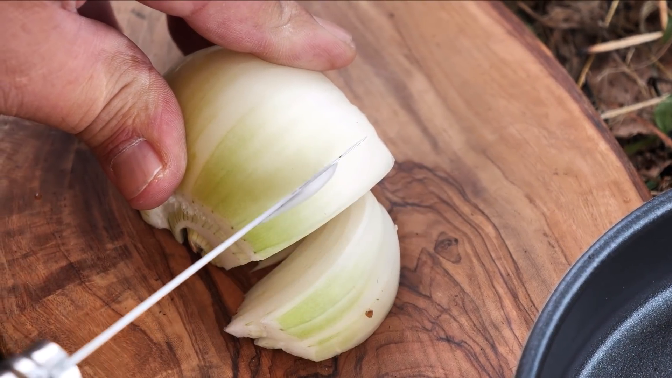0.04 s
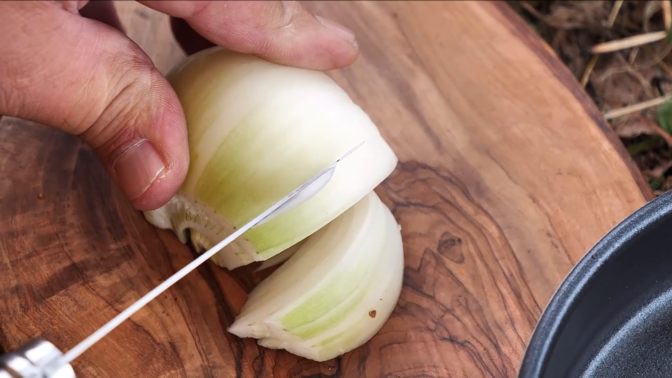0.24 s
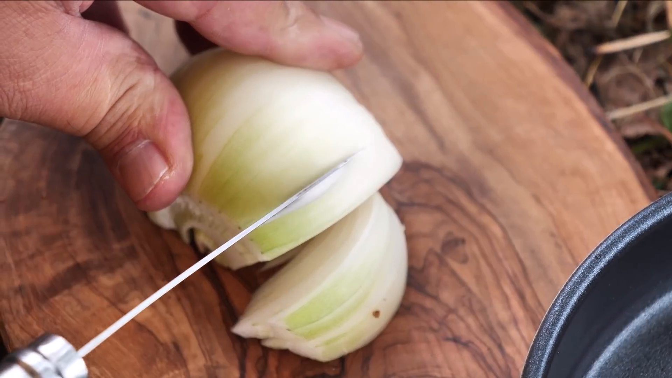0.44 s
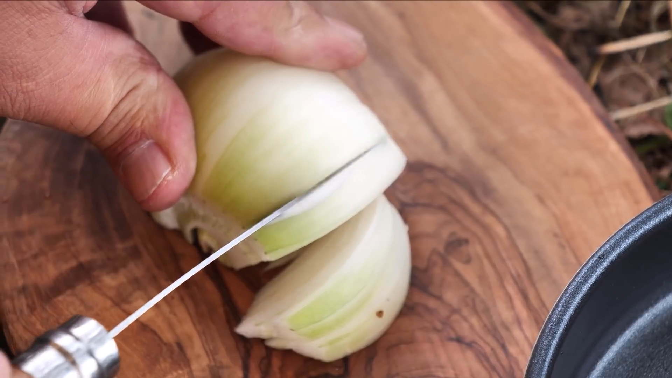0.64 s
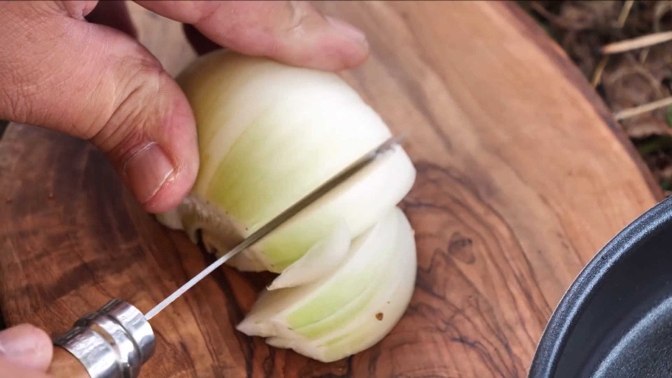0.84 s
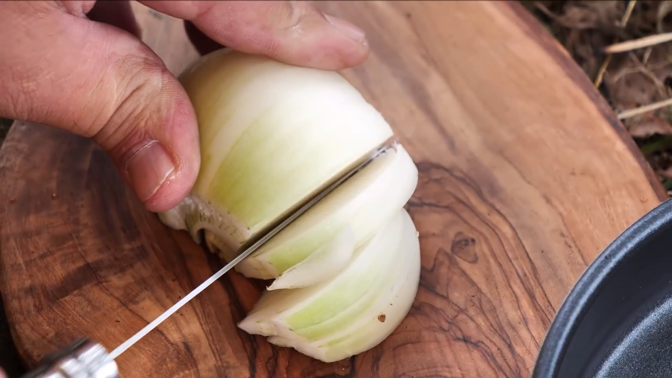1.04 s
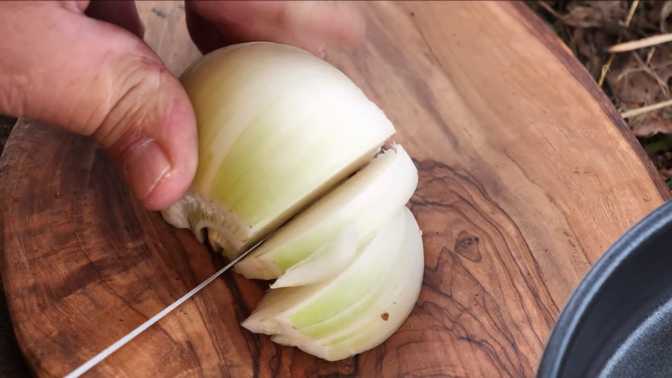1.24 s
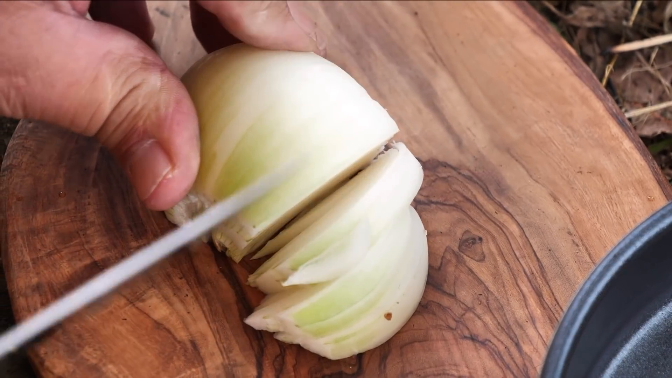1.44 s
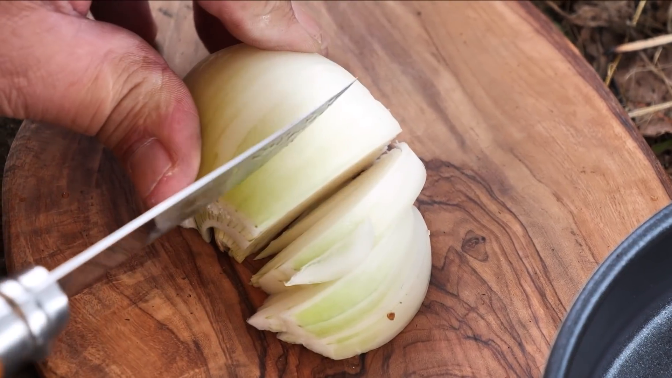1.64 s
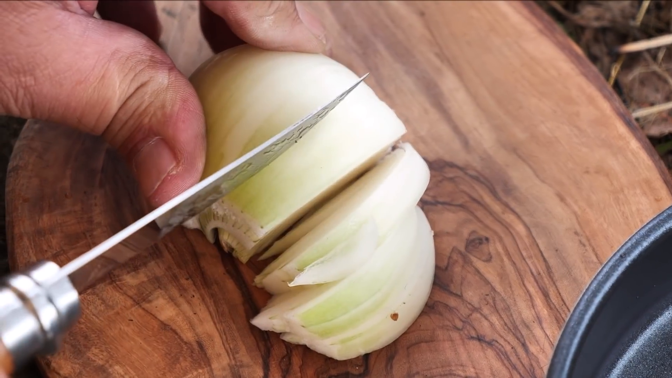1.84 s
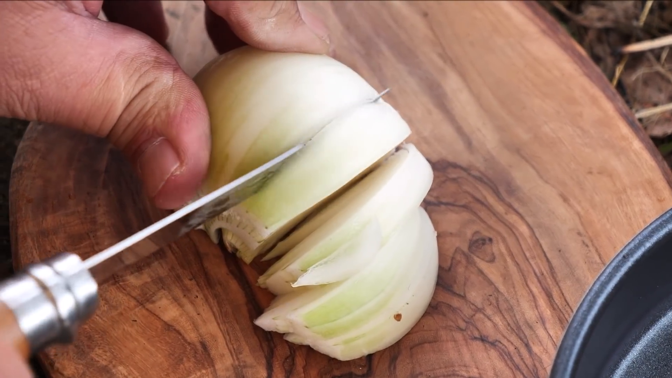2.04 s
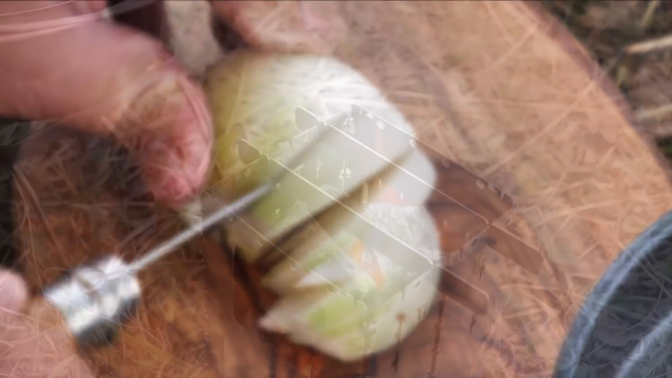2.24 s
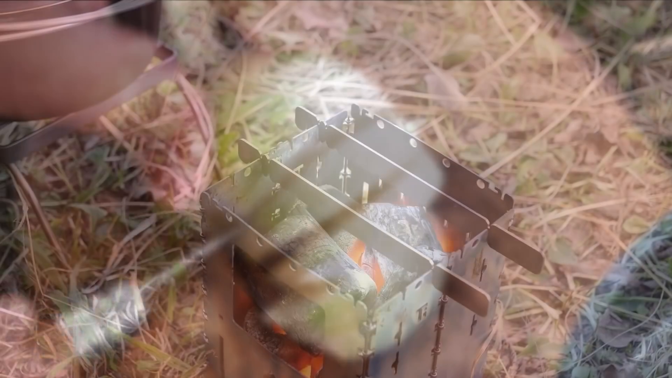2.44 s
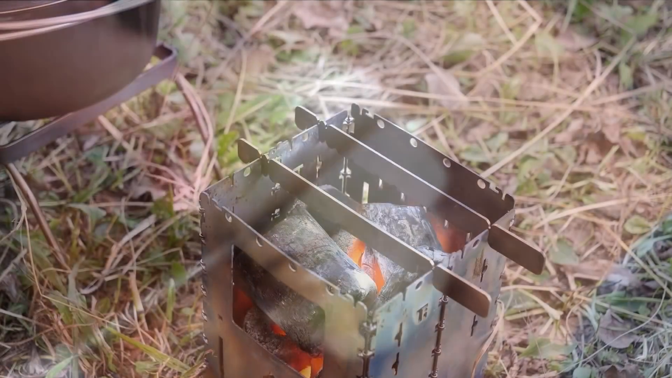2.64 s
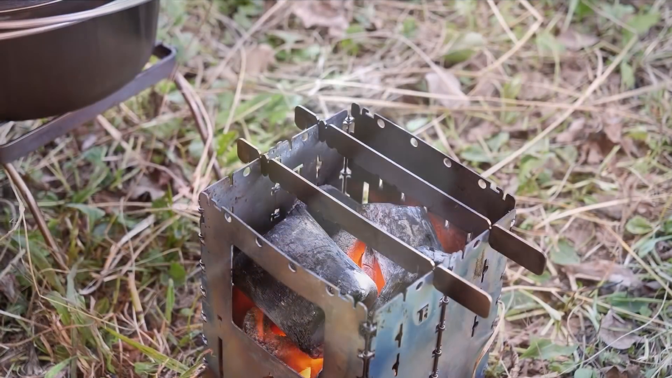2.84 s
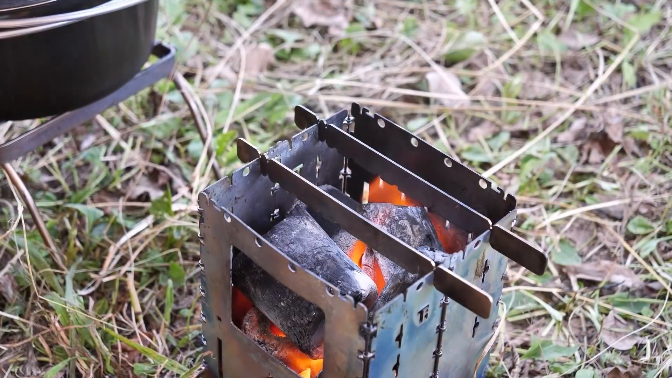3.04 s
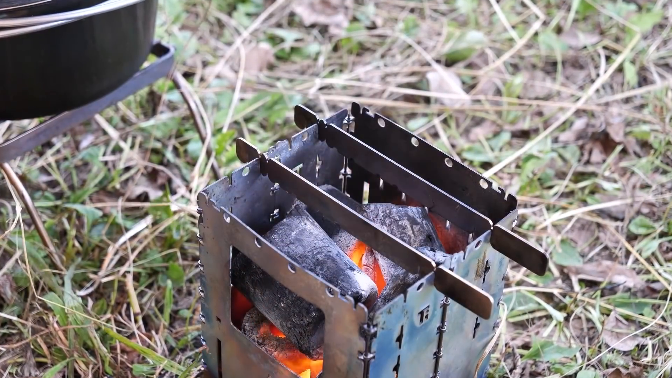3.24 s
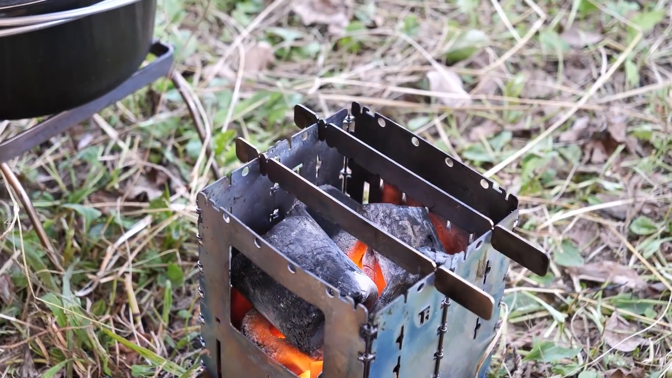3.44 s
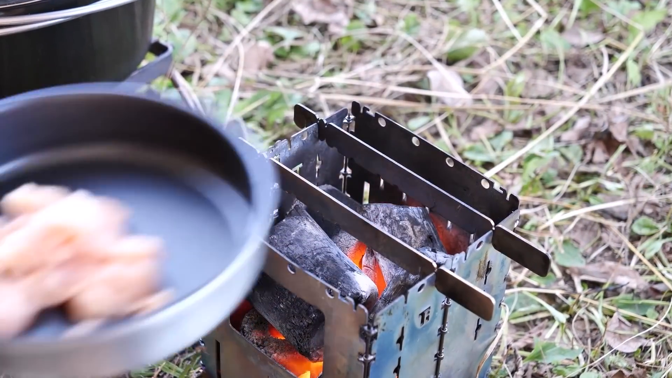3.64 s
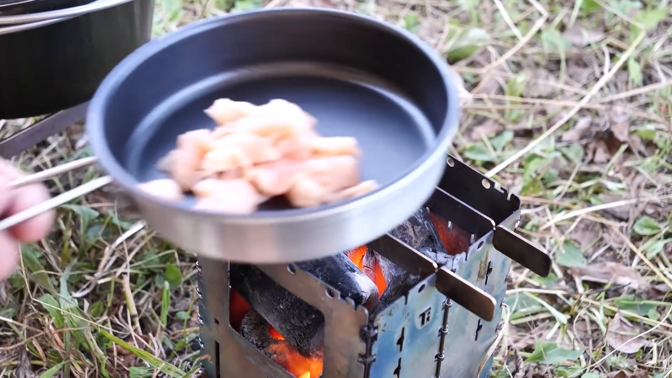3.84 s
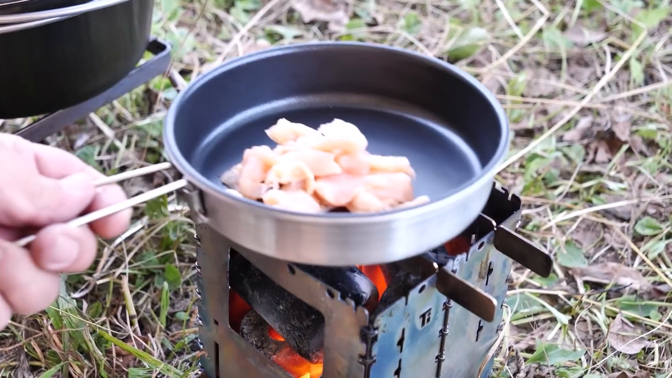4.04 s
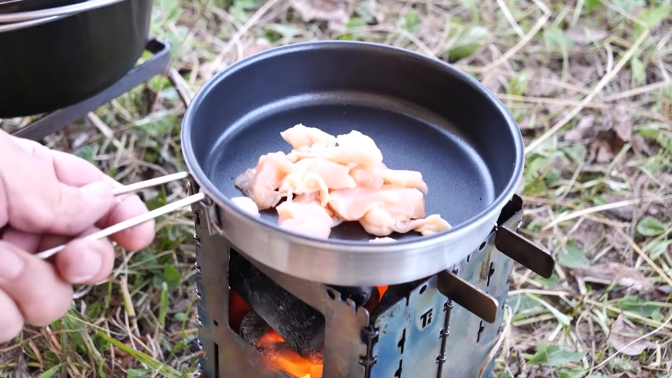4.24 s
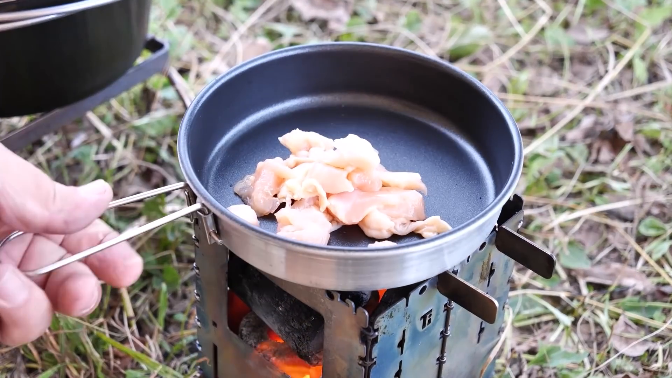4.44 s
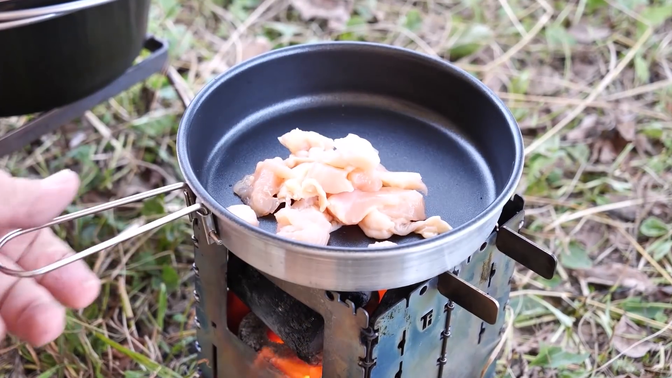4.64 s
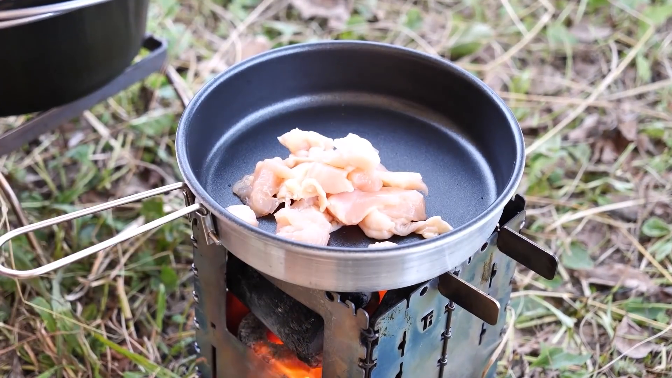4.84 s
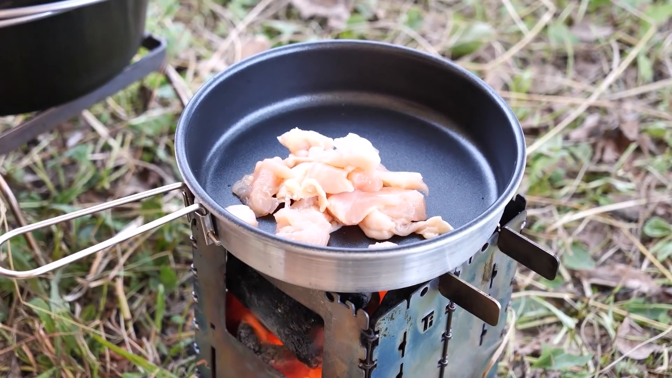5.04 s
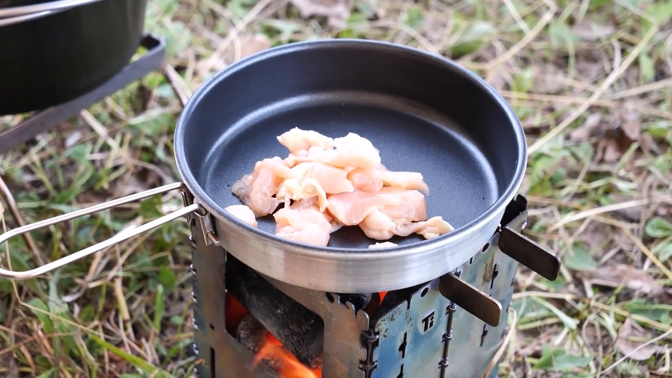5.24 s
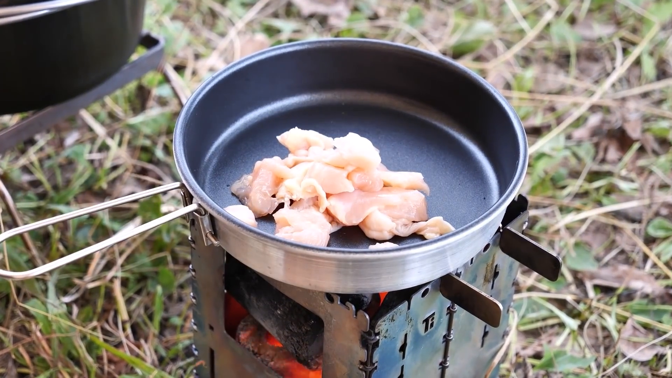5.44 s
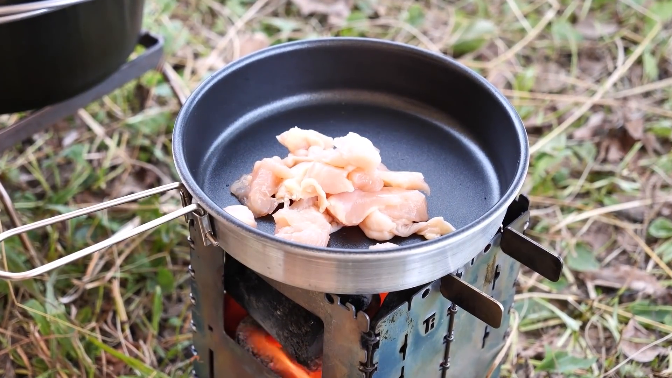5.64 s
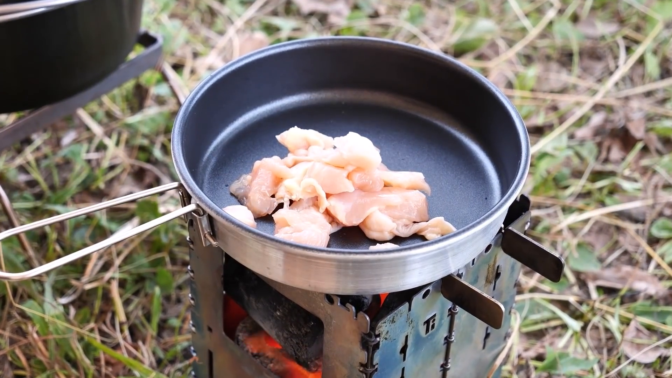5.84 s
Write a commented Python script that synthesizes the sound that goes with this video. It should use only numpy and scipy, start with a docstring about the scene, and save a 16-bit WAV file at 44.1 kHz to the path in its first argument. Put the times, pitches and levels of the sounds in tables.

```python
"""A knife crunches twice through an onion and knocks on a thick wooden board; then a small metal pan
clatters down on the steel bars of a charcoal stove, whose embers tick. Rumble and soft hiss lie below.
Onion: random snaps under swelling pushes. Knife, pan: contact bursts plus decaying modes. Embers: bursts.
The cook's moves: grainy rustle, noise scuffs and bursts. Open air: shaped noise with a wavering band."""
import sys
import numpy as np
from scipy import signal
from scipy.fft import rfft, irfft
from scipy.io import wavfile

SR = 44100
rng = np.random.default_rng(int(sys.argv[2]) if len(sys.argv) > 2 else 0)


def output_pcm(signal):
    """Save a mono or channel-first signal as 16-bit PCM at the path in sys.argv[1].

    Samples are clipped to [-1, 1] before scaling.
    """
    pcm = np.clip(np.atleast_2d(signal).T, -1, 1) * 32767
    wavfile.write(sys.argv[1], SR, np.round(pcm).astype(np.int16))


N = 260471

# left-right correlation of distant or diffuse sound: f/Hz, correlation
FAR_LIKENESS = [(60, 0.9), (130, 0.95), (290, 0.78), (640, 0.35), (1400, 0.025), (3100, 0.023)]
# left-right correlation of nearby sound: f/Hz, correlation
NEAR_LIKENESS = [(300, 1), (800, 0.43), (1500, -0.29), (3000, -0.2), (8000, -0.043)]

PORT_LAG_S = 0.00011  # near sounds reach the left microphone first
EDGES = np.geomspace(22, 17000, 28)  # band edges, Hz
CENTRES = np.sqrt(EDGES[1:] * EDGES[:-1])
AGE = np.arange(SR // 5) / SR  # seconds since a blow


def click_response(band_hz):
    """Impulse response of one band-pass filter."""
    sos = signal.butter(2, band_hz, "band", fs=SR, output="sos")
    return signal.sosfilt(sos, (AGE == 0) + 1e-18)


BANK = np.array([click_response(band_hz) for band_hz in zip(EDGES, EDGES[1:])])


def onion():
    """Random snaps for bursting cells excite faint blade resonances; finer grains fizz as juice, layers snap."""
    # burst cell spectrum: f/Hz, relative density/dB per Hz
    crunch_spectrum = [(100, -34), (600, -7.5), (1000, -13), (2000, -7), (2900, 1), (4200, 2.5), (5600, 4),
                       (8400, -1), (10000, -37), (16000, -33)]
    # pushes, three to a cut: t at full force/s, attack/s, hold/s, release/s,
    # crunch relative level/dB, juice level re crunch/dB
    pushes = [(0.554, 0.045, 0, 0.082, -50.5, -14), (0.697, 0.084, 0.062, 0.27, -50.5, 1),
              (0.921, 0.079, 0, 0.03, -33.5, -7.5), (2.038, .016, 0.033, 0.051, -52, -16),
              (2.093, 0.013, 0.039, 0.081, -49, -11), (2.369, 0.12, 0.041, .03, -42.5, -8.5)]
    # blade damped by the onion: f/Hz, width/Hz, relative level/dB
    damped_blade = [(3370, 1200, -11.5), (5230, 350, -6.5), (8250, 520, -8.5)]
    # whole layers giving way: t/s, relative level/dB
    layer_snaps = [(.555, -51), (0.754, -40), (2.041, -43.5), (2.09, -41.5), (2.107, -42), (2.123, -44),
                   (2.255, -50.5), (2.315, -46)]
    # juice spectrum: f/Hz, relative density/dB per Hz
    spray = [(2000, -47), (7000, -1), (9500, 0), (12000, -5), (13500, -7), (16000, -2)]

    pressure, juice = 0, 0
    for s, attack_s, hold_s, release_s, db, juice_db in pushes:
        push = from_db(db) * swell(s, attack_s, release_s, hold_s)
        pressure = np.hypot(pressure, push)
        juice = np.hypot(juice, push * from_db(juice_db))

    cells = grains(per_s=2500, spread_db=1.5, clump_db=2.2)
    singing = 0
    for k, (hz, width_hz, db) in enumerate(damped_blade):
        peak = signal.iirpeak(hz, hz / width_hz, fs=SR)
        singing = singing + from_db(db) * rms_one(signal.lfilter(*peak, cells[k % 2]))
    out = pressure * (from_db(-2.0) * coloured(cells, crunch_spectrum, NEAR_LIKENESS) + singing)

    droplets = grains(per_s=5000, spread_db=1.5, clump_db=0.5)
    out += juice * coloured(droplets, spray, NEAR_LIKENESS)
    for s, db in layer_snaps:
        snap = burst(crunch_spectrum, t60=0.013, tail_db=-13, tail_t60=0.051, tilt_db=-1.0)
        add(out, s, from_db(db) * snap)
    wet_cut_hz = 12600  # wet flesh soaks up the very top
    return signal.sosfilt(signal.butter(6, wet_cut_hz, fs=SR, output="sos"), out)


def knife():
    """The edge cracks on the board and excites its modes; touches scrape the blade and excite its own."""
    # blade on board: t/s, crack relative level/dB, thud relative level/dB,
    # knock relative level/dB, crack tilt/dB per octave
    chops = [(0.9243, -15, -17.5, -14, 8.5), (.927, -21, -42, -34, -4), (0.9487, -36.5, -55, -53, -7.5),
             (2.4133, -23.5, -33, -41, 2)]
    # board modes: f/Hz, relative level/dB, t60/s
    board_modes = [(350, -9, 0.039), (456, -6, 0.029), (617, 3, 0.026), (724, 2, 0.014), (1513, -9, .022),
                   (2030, -3, 0.011), (3220, -8, .03), (4250, -20, 0.028)]
    # blade contact spectrum: f/Hz, relative density/dB per Hz
    crack_spectrum = [(40, -52), (220, -34), (500, -8), (1000, -16.5), (1800, 4.5), (2300, -11),
                      (2950, 10.5), (3900, 3), (5000, 4), (6400, 7.5), (8000, -12.5), (11000, -18),
                      (16000, -53)]
    # light touches: t/s, scrape relative level/dB, ring relative level/dB, tilt/dB per octave
    touches = [(0.141, -51, -75, 1), (0.164, -48, -72, 1), (0.983, -44, -78, 6), (1.319, -48, -58.5, -5),
               (1.365, -47, -58.5, 9.5), (1.392, -48.5, -58.5, 11), (1.412, -49, -58, 10),
               (1.769, -54.5, -76, 0)]
    # free blade modes: f/Hz, relative level/dB, t60/s
    blade_modes = [(2840, 6, 0.013), (6500, -26, 0.023), (6260, 0.5, 0.06), (8600, -10, 0.068)]

    out = np.zeros((2, N))
    for s, crack_db, thud_db, knock_db, tilt_db in chops:
        crack = burst(crack_spectrum, t60=0.018, tail_db=-25.5, tail_t60=0.16,
                      tilt_db=tilt_db, direct_db=13, crowd_db=1)
        crack = crack * from_db([[.7], [-.7]])
        board_colour = [(700, thud_db), (1500, knock_db)]
        thud = ring(board_modes, board_colour, uneven_db=0.3, contact_s=0.0003)
        thud = thud * from_db([[1.3], [-1.3]])
        add(out, s, from_db(crack_db) * crack + thud)
    for s, scrape_db, ring_db, tilt_db in touches:
        scrape = burst(crack_spectrum, t60=0.026, tail_db=-17, tail_t60=.08, tilt_db=tilt_db)
        blade_colour = [(3000, 7.0 - tilt_db), (7000, 1.5 + tilt_db)]
        tinkle = ring(blade_modes, blade_colour, uneven_db=3.0, contact_s=0.00022)
        add(out, s, from_db(scrape_db) * scrape + from_db(ring_db) * tinkle)
    return out


def pan():
    """Each contact favours other modes and scales their ring time; the free rim keeps its own decay."""
    # pan on stove bars: t/s, relative level/dB, ring time/share of free time, favoured f/Hz, lift/dB
    hits = [(4.155, -27.5, 0.86, 4540, 8), (4.213, -52, 3.3, 1300, 7), (4.254, -21.5, 0.42, 1430, 8.5),
            (4.2855, -39, 0.36, 910, 19), (4.2915, -41, 0.84, 1160, 10), (4.3361, -42.5, 1.1, 7540, 10),
            (4.3596, -23, .8, 6640, 7.5), (4.3689, -24, 0.87, 1020, 9), (4.3896, -22.5, 0.44, 6040, 7.5)]
    # joint pan and stove modes: f/Hz, relative level/dB, free t60/s
    pan_modes = [(365, -15.5, 0.2), (729, -14.5, 0.07), (942, 2.5, 0.024), (894, -2, 0.014),
                 (1034, -3, 0.045), (1180, 7.5, 0.038), (1210, -21, 0.082), (1325, -34, 0.011),
                 (1630, -10, 0.08), (1780, -21, 0.035), (2270, -35, 0.21), (2080, -11.5, 0.086),
                 (3330, -10, 0.031), (3680, -16, 0.1), (3970, -19, 0.025), (4730, -22, 0.063),
                 (5250, -6.5, 0.065), (6210, -12, 0.092), (5830, -19, 0.04), (6330, -6, 0.054),
                 (6400, -33, 0.052), (8200, -19, 0.039), (9170, -18, 0.038), (11300, -21.5, 0.049)]
    # contact spectrum: f/Hz, relative density/dB per Hz
    clatter_spectrum = [(40, -53), (200, -10.5), (400, -1), (900, 3), (1300, 2.5), (2500, -4), (5000, -5.5),
                        (7000, -12.5), (9000, -14), (12000, -45), (16000, -30)]
    # rim modes: f/Hz, relative level/dB, t60/s
    rim_modes = [(1230, -15, .3), (2100, -21, .2)]
    favoured_octaves = 0.51  # standard deviation of the lift

    out = np.zeros((2, N))
    for s, hit_db, free, favoured_hz, lift_db in hits:
        octaves_off = np.log2(CENTRES / favoured_hz)
        colour_db = hit_db + lift_db * np.exp(-.5 * (octaves_off / favoured_octaves) ** 2)
        spectrum = at_hz(clatter_spectrum, CENTRES) + colour_db
        # burst() normalizes its spectrum, so restore the strength
        strength = np.sqrt(np.average(from_db(spectrum) ** 2, weights=np.diff(EDGES)))
        clatter = burst(np.c_[CENTRES, spectrum], t60=0.019 * free, tail_db=-9,
                        tail_t60=0.17 * free, direct_db=12.5, crowd_db=-4)
        modes = [(hz, db, t60 * free) for hz, db, t60 in pan_modes] + rim_modes
        clang = ring(modes, np.c_[CENTRES, colour_db], uneven_db=4.5, contact_s=0.00042)
        add(out, s, from_db(7.5) * strength * clatter + from_db(-2.5) * clang)
    return out * from_db([[-.6], [.6]])


def embers():
    """Small brittle cracks in the glowing charcoal: short bursts around one frequency each."""
    # ticks: t/s, relative level/dB, centre f/Hz
    ticks = [(2.593, -50.5, 7100), (2.709, -43.5, 5600), (2.712, -61, 2030), (3.012, -50.5, 6400),
             (3.027, -44.5, 8700), (3.539, -58, 9000), (3.787, -43.5, 10600), (4.614, -48.5, 6300),
             (5.396, -52, 8200)]
    out = np.zeros((2, N))
    for s, db, hz in ticks:
        hump = [(hz / 20, -45), (hz / 5, -25), (hz / 2.9, -9), (hz, 0), (hz * 1.64, -17), (hz * 4, -35)]
        add(out, s, from_db(db) * burst(hump, t60=0.014, tail_db=-8.5, tail_t60=0.13))
    return out


def handling():
    """The cook moves about: grains rustle, noise scuffs, bursts knock, among them soft touches of the pan;
    fainter knocks fall at random."""
    # larger moves that swell the rustle: t at top/s, attack/s, release/s, hold/s, level/dB
    moves = [(3.54, 0.57, 0.25, 0.13, -52), (5.013, 0.046, 0.11, 0.029, -49),
             (5.538, .15, 0.26, 0.071, -55.5)]
    # cloth and grass spectrum: f/Hz, relative density/dB per Hz
    rustle_spectrum = [(150, -46), (250, -14), (537, -2.5), (632, -7), (843, 4), (1310, -4), (1540, -3),
                       (5000, -4.5), (6500, -58), (11000, -120)]
    # hollow, muffled scuffs: t at top/s, attack/s, release/s, level/dB
    scuffs = [(2.775, 0.042, 0.14, -56.5), (3.09, 0.062, 0.14, -50), (3.24, 0.082, 0.71, -56.5),
              (3.59, 0.22, 0.3, -60)]
    # louder knocks, the pair near 4.07 s soft touches of the pan before it lands: t/s, relative level/dB,
    # tilt/dB per octave
    bumps = [(.452, -46.5, -6.5), (0.522, -46, 1), (2.256, -43.5, -9.5), (2.757, -35, -12),
             (2.788, -44, -10.5), (2.934, -38.5, -9.5), (3.611, -36, -5.5), (3.667, -42, 6),
             (4.0644, -31.5, -.5), (4.0851, -31.5, 2), (4.473, -56, 8), (4.698, -42.5, -2.5),
             (5.008, -38, 5.5), (5.034, -33, -7), (5.212, -42, 6.5), (5.53, -46, 2)]
    # knock spectrum: f/Hz, relative density/dB per Hz
    bump_spectrum = [(30, -34), (150, -10), (400, -6), (650, -4), (880, -2), (1200, -19), (1800, -37),
                     (5000, -39), (16000, -68)]
    # scuff spectrum: f/Hz, relative density/dB per Hz
    hollow = [(60, -38), (280, -3.0), (500, 2), (800, -16.0), (3000, -57)]
    busy_from_s, rustle_db, rustle_attack_s = 3.2, -58.5, 0.33
    faint_count, faint_db, faint_spread_db = 9, -49, 3
    rustle_top_hz = 2400  # soft cloth and grass have little treble

    steady = from_db(rustle_db) * swell(busy_from_s, rustle_attack_s, rustle_attack_s, hold_s=N / SR)
    move_power = sum((from_db(db) * swell(*shape)) ** 2 for *shape, db in moves)
    moving = np.sqrt(steady ** 2 + move_power)
    rustle_grains = grains(per_s=700, spread_db=3.2, clump_db=2.8)
    out = moving * coloured(rustle_grains, rustle_spectrum, FAR_LIKENESS)
    out = signal.sosfilt(signal.butter(2, rustle_top_hz, fs=SR, output="sos"), out)

    scuffing = sum(from_db(db) * swell(*shape) for *shape, db in scuffs)
    out += scuffing * coloured(rng.standard_normal((2, 2, N)), hollow, FAR_LIKENESS)

    faint = []
    for when, size in rng.random((faint_count, 2)):
        s = busy_from_s + when * (N / SR - busy_from_s)
        faint.append((s, faint_db + faint_spread_db * (2 * size - 1), 0))
    for s, db, tilt_db in bumps + faint:
        bump = burst(bump_spectrum, t60=.02, tail_db=-19, tail_t60=.12,
                     tilt_db=tilt_db, direct_db=17, crowd_db=-8)
        add(out, s, from_db(db) * bump)
    return out


def open_air():
    """Shaped noise: distant rumble, soft hiss and a faint resonant band that wavers within the hiss."""
    # background: t/s, rumble relative level/dB, hiss relative level/dB
    air_levels = [(0.0, -56, -64.5), (0.89, -58, -60.5), (1.55, -60, -68), (2.15, -66.5, -71.5),
                  (3.11, -53.5, -65.5), (4.23, -47, -60), (4.92, -50, -62.5), (5.33, -48, -61.5),
                  (5.91, -47, -64)]
    # rumble spectrum: f/Hz, relative density/dB per Hz
    rumble_spectrum = [(15, -51), (25, -32), (75, 0.5), (135, -1), (202, -1), (277, -21.5), (436, -21),
                       (600, -32.5), (780, -45), (1320, -120)]
    # hiss spectrum: f/Hz, relative density/dB per Hz
    hiss_spectrum = [(180, -38), (300, 3.5), (511, -3.5), (624, -5), (885, -3.5), (1300, -4), (2320, -5.5),
                     (2930, -6.5), (3890, -8), (5250, -7), (11500, -20), (14700, -17), (16000, -49)]

    rumble_db, hiss_db = in_time(air_levels)
    rumble = coloured(rng.standard_normal((2, 2, N)), rumble_spectrum, FAR_LIKENESS)
    rumble = from_db(rumble_db + 1) * rumble
    hiss = coloured(rng.standard_normal((2, 2, N)), hiss_spectrum, FAR_LIKENESS)

    singing_hz, width_hz = 3000, 220
    peak = signal.iirpeak(singing_hz, singing_hz / width_hz, fs=SR)
    singing = signal.lfilter(*peak, rng.standard_normal((2, N)))
    singing = rms_one(signal.lfilter(*peak, singing))
    waver = from_db(-13.5 + 2.5 * drift(rate=18))
    return rumble + from_db(hiss_db + 6) * (hiss + waver * singing)


def burst(spectrum, t60, tail_db, tail_t60, tilt_db=0, direct_db=8, crowd_db=0):
    """A sharp contact pulse, then decaying noise for crowded damped modes and faint scatter nearby."""
    envelope = from_db(crowd_db) * dying(t60) + from_db(tail_db) * dying(tail_t60)
    drive = rng.choice([-1, 1], (2, 2, len(AGE))) * envelope
    direct = from_db(direct_db) * pulse(spectrum, tilt_db)
    return direct + coloured(drive, spectrum, NEAR_LIKENESS, tilt_db)


def pulse(spectrum, tilt_db):
    """Minimum-phase pulse, the most compact causal one with this spectrum; unit energy, right delayed."""
    hz = np.arange(1, len(AGE) // 2 + 2) * SR / len(AGE)
    magnitude = from_db(at_hz(spectrum, hz) + tilt_db * np.log2(hz))
    cepstrum = irfft(np.log(magnitude), len(AGE))
    causal = (AGE < AGE[-1] / 2) * (AGE > 0)
    response = np.exp(rfft(2 * cepstrum * causal))
    lag = np.exp(-2j * np.pi * hz * np.array([[0], [PORT_LAG_S]]))
    pair = irfft(response * lag, len(AGE))
    return pair / np.linalg.norm(pair[0])


def ring(modes, colour, uneven_db, contact_s):
    """Struck modes build up over the contact; higher ones radiate unevenly to the two microphones."""
    out = 0
    for k, (hz, db, t60) in enumerate(modes):
        scatter = min(hz / 4000, 1) ** 2
        phase = 2 * np.pi * hz * (AGE - np.array([[0], [PORT_LAG_S]]))
        phase = phase + scatter * rng.uniform(-np.pi, np.pi, (2, 1))
        offset_db = uneven_db * (rng.normal() + scatter * rng.normal(size=(2, 1)))
        strength = from_db(db + at_hz(colour, hz) + offset_db)
        out = out + (-1) ** k * strength * np.sin(phase) * dying(t60)
    out = out * (1 - np.exp(-AGE / contact_s))
    return signal.sosfilt(signal.butter(2, 250, "high", fs=SR, output="sos"), out)


def grains(per_s, spread_db, clump_db):
    """Random snaps of uneven size whose level drifts in clumps, unit power."""
    sizes = from_db(spread_db * np.minimum(rng.exponential(1, (2, 2, N)), 4))
    snaps = sizes * rng.choice([-1, 1], sizes.shape) * (rng.random(N) < per_s / SR)
    return rms_one(snaps * from_db(clump_db * drift(rate=160)))


def coloured(drive, spectrum, likeness, tilt_db=0):
    """Four drives (mid/side by odd/even bands) become stereo with this spectrum and correlation."""
    gains = from_db(at_hz(spectrum, CENTRES) + tilt_db * np.log2(CENTRES))
    gains = gains / np.sqrt(np.sum(gains ** 2 * np.diff(EDGES)) * 2 / SR)
    alike = np.clip(at_hz(likeness, CENTRES), -1, 1)
    shares = gains * np.sqrt(np.array([1 + alike, 1 - alike]) / 2)
    responses = np.array([shares[:, k::2] @ BANK[k::2] for k in (0, 1)])
    mid, side = signal.fftconvolve(drive, responses, axes=-1).sum(axis=0)[:, :drive.shape[-1]]
    return np.array([mid + side, mid - side])


def swell(top_s, attack_s, release_s, hold_s=0):
    """Gain of one gesture: 20 dB up over the attack, a hold, 20 dB down over the release."""
    t = np.arange(N) / SR - top_s
    away = np.maximum(-t, 0) / attack_s + np.maximum(t - hold_s, 0) / release_s
    return from_db(-np.minimum(20 * away, 200))


def drift(rate):
    """Gaussian random points, rate per second, joined by straight lines."""
    return np.interp(np.arange(N) / SR * rate, np.arange(4000), rng.standard_normal(4000))


def dying(t60):
    """Exponential decay after a blow, 60 dB in t60 seconds."""
    return from_db(-60 * AGE / t60)


def from_db(db):
    """Decibels to gain."""
    return 10 ** (np.asarray(db) / 20)


def rms_one(x):
    """Scale to unit power."""
    return x / np.sqrt(np.mean(x ** 2) + 1e-20)


def in_time(rows):
    """Interpolate the level columns of a curve at every sample."""
    s, *columns = np.transpose(rows)
    return [np.interp(np.arange(N) / SR, s, c) for c in columns]


def at_hz(points, hz):
    """Read a table on a log-frequency axis."""
    known_hz, values = np.transpose(points)
    return np.interp(np.log(hz), np.log(known_hz), values)


def add(out, s, sound):
    """Mix a short sound in at s seconds."""
    start = round(s * SR)
    out[:, start:start + sound.shape[1]] += sound[:, :N - start]


def scene():
    """Sum of all sources, with no room reverberation."""
    return onion() + knife() + pan() + handling() + embers() + open_air()


def record(dry):
    """A steep elliptic low-pass cuts the top."""
    cutoff_hz = 15900
    return signal.sosfilt(signal.ellip(10, .1, 80, cutoff_hz, fs=SR, output="sos"), dry)


dry = scene()
out = record(dry)
output_pcm(out)
```